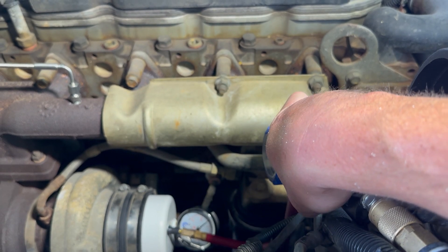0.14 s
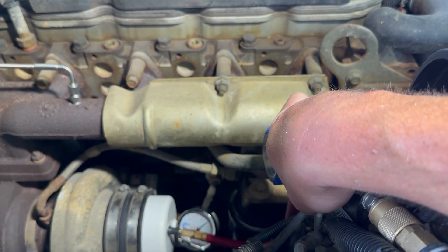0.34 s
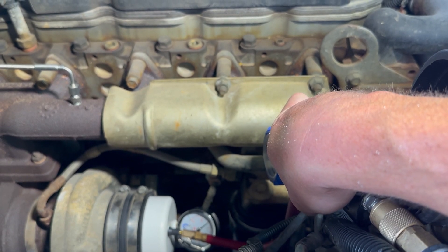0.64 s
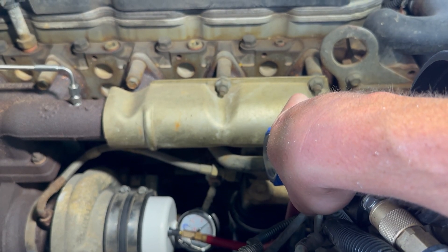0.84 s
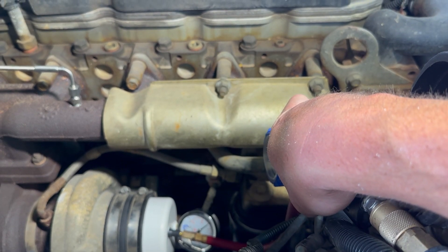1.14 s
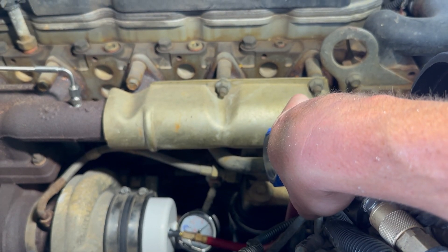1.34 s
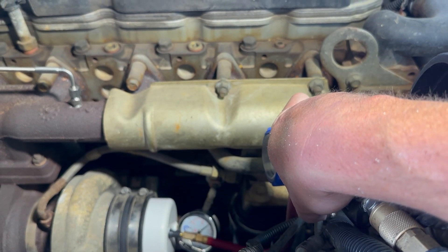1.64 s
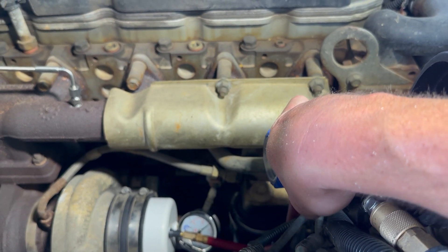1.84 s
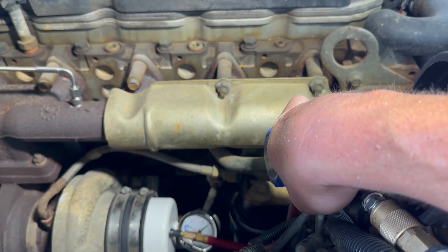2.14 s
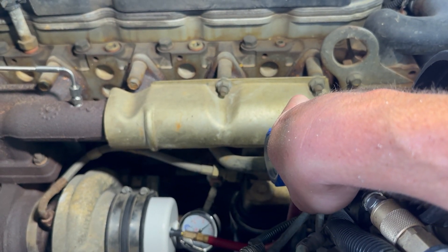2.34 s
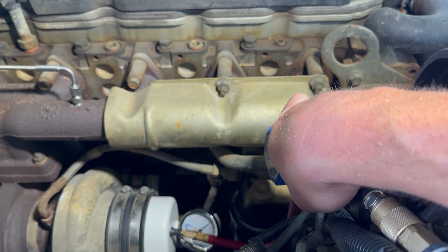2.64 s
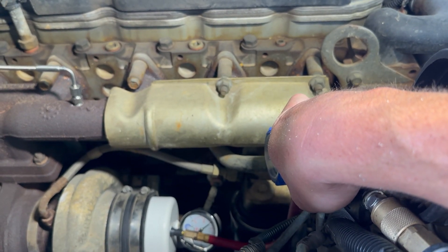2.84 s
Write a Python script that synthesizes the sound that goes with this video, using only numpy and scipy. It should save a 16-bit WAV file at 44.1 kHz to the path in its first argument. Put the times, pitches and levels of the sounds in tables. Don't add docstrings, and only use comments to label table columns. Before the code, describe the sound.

A close stereo microphone in an outdoor engine bay catches a bright, piercing air hiss starting abruptly, cutting off for a moment, then returning with light knocks and a faint breathy hose moan.

```python
import sys
import numpy as np
from scipy import signal
from scipy.fft import rfft, irfft
from scipy.io import wavfile

SR = 44100
rng = np.random.default_rng(int(sys.argv[2]) if len(sys.argv) > 2 else 0)


def voltage_ratio(level):
    return 10 ** (np.asarray(level, float) / 20)


def materialize(psi):
    bounded = np.clip(np.atleast_2d(psi).T, -1, 1)
    quanta = np.round(bounded * 32767).astype(np.int16)
    wavfile.write(sys.argv[1], SR, quanta)


N = 132300
T = np.arange(N) / SR
HZ = np.maximum(np.arange(N // 2 + 1) * SR / N, 1)


def rms_one(x):
    return x / np.sqrt(np.mean(x ** 2) + 1e-20)


def in_time(rows):
    return voltage_ratio(np.interp(T, *np.transpose(rows)))


def at_hz(points):
    hz, value = np.transpose(points)
    return np.interp(np.log(HZ), np.log(hz), value)


def drift(rate_per_s):
    r = np.exp(-80 * np.pi * rate_per_s / SR)
    noise = rng.standard_normal(N // 40 + 2002)
    slow = signal.lfilter([1], [1, -2 * r, r * r], noise)[2000:]
    return np.interp(np.arange(N) / 40, np.arange(len(slow)), rms_one(slow - slow.mean()))


def resonate(x, hz, width_hz):
    r = np.exp(-np.pi * width_hz / SR)
    b = np.array([1, 0, -1]) * (1 - r * r) / 2
    a = [1, -2 * r * np.cos(2 * np.pi * hz / SR), r * r]
    return signal.lfilter(b, a, x)


def resonate_twice(x, hz, width_hz):
    return resonate(resonate(x, hz, width_hz), hz, width_hz)


def ringing_noise(hz, width_hz):
    return rms_one(resonate_twice(rng.standard_normal((2, N)), hz, width_hz))


def coloured(gain):
    return irfft(rfft(rng.standard_normal((2, N))) * gain, N)


# frequency in Hz, density in dB per Hz.
RUMBLE_SPECTRUM = [(15, -81), (25, 4), (43, -12.5), (70, 2), (125, -5), (146, -14), (271, -22), (385, -24),
                   (450, -21.5), (580, -52), (990, -120)]
# frequency in Hz, density in dB per Hz.
LEAK_SPECTRUM = [(450, -4.5), (700, -5), (1100, -6.5), (1400, -10), (2800, -19.5), (5200, -7.5),
                 (6100, -4.5), (7300, -17)]
# centre in Hz, width in Hz, level in dB.
DRONES_HZ_DB = [(61.6, 13.7, -62), (79.7, 3.7, -65), (123.6, 6.3, -66)]


def yard():
    rumble_db, leak_db = -60.0, -66
    low_cut = np.minimum(HZ / 45, 1) ** 7.8
    rumble = rms_one(coloured(voltage_ratio(at_hz(RUMBLE_SPECTRUM)) * (HZ < 450) * low_cut))
    sound = rumble * voltage_ratio(rumble_db + 1.15 * drift(1.8))
    for hz, width_hz, db in DRONES_HZ_DB:
        drone = resonate(rng.standard_normal((2, N)), hz, width_hz)
        sound += voltage_ratio(db) * rms_one(drone)
    top_fade = np.minimum(1, .15 + np.exp((9500 - HZ) / 500))
    leak = rms_one(coloured(voltage_ratio(at_hz(LEAK_SPECTRUM)) * (HZ > 450) * top_fade))
    return sound + voltage_ratio(leak_db) * leak


# time in seconds, jet level in dB.
VALVE_FLOW = [(0, -74), (.086, -70), (.097, -45), (.11, -36.5), (.17, -37), (.22, -37.5), (1.0, -38.5),
              (1.4, -38), (1.44, -43.5), (1.53, -66), (1.58, -72.5), (1.748, -73), (1.76, -47.5),
              (1.772, -37.5), (1.787, -34.5), (1.797, -38), (2.4, -38), (3, -38.5)]
# frequency in Hz, density in dB per Hz.
JET_SPECTRUM = [(400, -38), (1900, -33), (2600, -23), (4400, -24), (7800, -19), (9100, -13), (11000, -22),
                (14800, -18)]
# centre in Hz, width in Hz, peak in dB.
TUBING_MODES = [(944, 13, -33), (1121, 93, -20.5), (2142.5, 42, -18), (2515, 45, -9), (2600, 70, -11),
                (3170, 40, -15), (3675, 94, -15.5), (3934, 62, -17.5), (4586, 27, -15.5), (5270, 50, -17),
                (5760, 37, -9.5), (6470, 32, -16), (7030, 122, -12), (7460, 41, -17)]
# centre in Hz, width in Hz, peak in dB.
FITTING_MODES = [(8200, 90, -4), (8360, 90, -6), (8665, 45, 2.5), (8940, 60, -1.5), (9300, 60, -6),
                 (9520, 100, -4), (10280, 90, -9), (11800, 300, -16), (12850, 80, -12), (13350, 200, -8),
                 (14040, 100, -14), (14430, 130, -12), (14780, 100, -7), (15230, 100, -13)]
# centre in Hz, width in Hz, peak in dB.
RIM_MODE = (15700, 80, -11)
# centre in Hz, width in Hz, depth 0-1.
METAL_NOTCHES = [(4100, 80, .7), (11000, 120, .9), (13750, 200, .7)]


def jet():
    waver_db, waver_per_s = 0.5, 12.2
    gust_db, gust_per_s = 0.19, 12
    air = coloured(voltage_ratio(at_hz(JET_SPECTRUM)))
    drive = rng.standard_normal((3, 2, N))
    for k, (hz, width_hz, db) in enumerate(TUBING_MODES + FITTING_MODES + [RIM_MODE]):
        mode = resonate_twice(drive[k % 3], hz, width_hz * 1.16)
        air = air + voltage_ratio(db + waver_db * drift(waver_per_s)) * mode
    cut = np.ones(len(HZ))
    for hz, width_hz, depth in METAL_NOTCHES:
        cut *= 1 - depth / (1 + (2 * (HZ - hz) / width_hz) ** 2)
    air = rms_one(irfft(rfft(air) * cut, N))
    return in_time(VALVE_FLOW) * voltage_ratio(gust_db * drift(gust_per_s)) * air


# start in seconds, whistle level in dB, spit level in dB.
VALVE_CRACKS = [
    (.095, -53, -56),
    (1.76, -52, -57),
]


def cracks():
    length_s, whistle_hz, whistle_width_hz, spit_hz = .022, 2530, 150, 13000
    whistle = ringing_noise(whistle_hz, whistle_width_hz)
    spit = rms_one(coloured(1 / (1 + (spit_hz / HZ) ** 8)))
    spit = spit * [[.5], [4.0]]
    out = np.zeros((2, N))
    for start_s, whistle_db, spit_db in VALVE_CRACKS:
        swell = np.sin(np.pi * np.clip((T - start_s) / length_s, 0, 1))
        out += swell * (voltage_ratio(whistle_db) * whistle + voltage_ratio(spit_db) * spit)
    return out


# start in seconds, level in dB, centre in Hz, T60 in seconds.
HAND_KNOCKS = [(.12, -61, 450, 0.25), (0.148, -52.5, 215, 0.31), (1.369, -56, 157, 0.68),
               (1.402, -58, 760, .045), (1.782, -58, 1000, .15), (1.79, -56, 400, .2),
               (2.202, -57, 258, 0.29), (2.599, -55.5, 620, 0.14), (2.612, -54.5, 655, 0.14),
               (2.629, -48.5, 188, 0.09)]


def knocks():
    attack_s = 0.0028
    out = np.zeros((2, N))
    for start_s, db, hz, t60_s in HAND_KNOCKS:
        age_s = np.maximum(T - start_s, 0)
        envelope = voltage_ratio(db - 60 * age_s / t60_s) * np.minimum(age_s / attack_s, 1)
        out += envelope * ringing_noise(hz, 0.95 * hz)
    return out


# time in seconds, level in dB.
HOSE_MOAN = [(1.8, -66), (2.136, -64.5), (2.17, -70), (2.288, -57.5), (2.514, -74), (2.628, -60),
             (2.694, -66), (2.892, -65), (3.0, -99)]


def moan():
    note_hz, overtone_hz, width_hz, overtone_db = 668.4, 2128, 38, -65.5
    note = in_time(HOSE_MOAN) * ringing_noise(note_hz, width_hz)
    overtone = voltage_ratio(overtone_db) * ringing_noise(overtone_hz, width_hz)
    onset = np.clip((T - HOSE_MOAN[0][0]) / 0.013, 0, 1)
    return onset * (note + overtone)


def bay(x):
    t60_s = .05
    age_s = np.arange(SR // 4) / SR
    h = rng.standard_normal(len(age_s)) * voltage_ratio(-60 * age_s / t60_s)
    h = h / np.sqrt(np.sum(h ** 2))
    return rfft(signal.fftconvolve(x, h)[:N]) * (HZ > 300)


# frequency in Hz, left-right likeness -1 to 1.
PORT_LIKENESS = [(150, .965), (550, -.3), (1100, .3), (1700, .1), (2400, .75), (3600, .2), (5900, .15),
                 (6500, .8),
                 (7300, .95), (8500, .85), (9250, .99), (10450, .988), (11000, .8), (12100, .995),
                        (13500, .9), (14500, .991)]
# frequency in Hz, left lead in radians.
PORT_LEAD = [(6500, 0.0), (8000, .3), (9200, 3.1), (10550, 3.25), (11150, 6.15), (12750, 6.4),
             (14150, 9.36), (16000, 9.43)]
# frequency in Hz, left minus right in dB.
PORT_BALANCE = [(100, -1.6), (1000, 1.1), (2700, -3.5), (3100, 2.2), (5000, -5), (6300, 0.0), (16000, 0.0)]


def scene():
    bay_share, ripple_db = .45, -12
    sway_db, sway_per_s, sway_above_hz = 2.5, 8, 6500
    sound = jet() + cracks() + moan() + knocks() + yard()
    shared, unlike = rfft(sound)
    unlike = np.sqrt(bay_share) * bay(sound[0]) + np.sqrt(1 - bay_share * (HZ > 300)) * unlike
    high = HZ > sway_above_hz
    swaying = irfft(unlike * high, N) * voltage_ratio(sway_db * drift(sway_per_s))
    unlike = unlike * ~high + rfft(swaying)
    shared = shared + voltage_ratio(ripple_db) * bay(sound[0])
    alike = at_hz(PORT_LIKENESS)
    a = np.sqrt((1 + alike) / 2) * shared
    b = np.sqrt((1 - alike) / 2) * unlike
    turn = np.exp(.5j * at_hz(PORT_LEAD))
    pan = voltage_ratio(at_hz(PORT_BALANCE) / 2)
    return irfft(np.array([(a + b) * turn * pan, (a - b) / turn / pan]), N)


def band_limit(x):
    return signal.sosfilt(signal.butter(12, 15720, fs=SR, output="sos"), x)


def record(dry):
    mix = irfft(rfft(dry) * (HZ < 15750), N)
    return band_limit(mix)


dry = scene()
out = record(dry)
materialize(out)
```